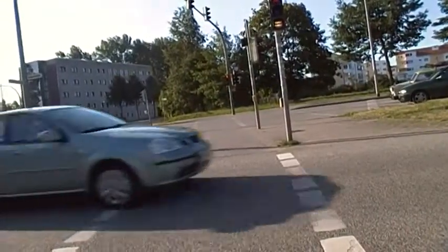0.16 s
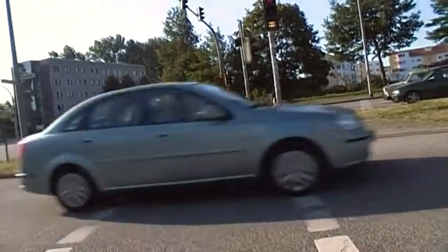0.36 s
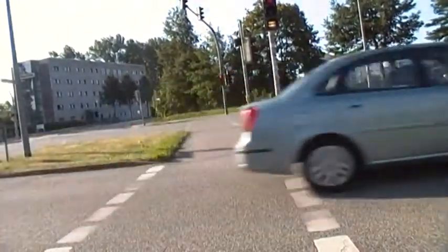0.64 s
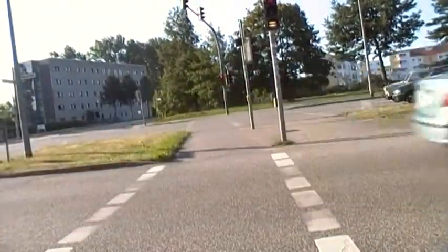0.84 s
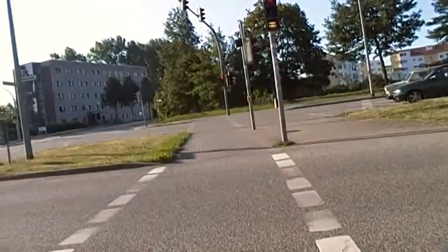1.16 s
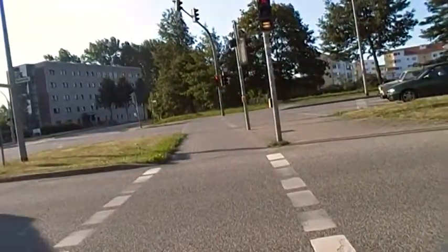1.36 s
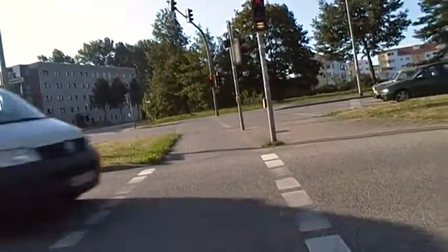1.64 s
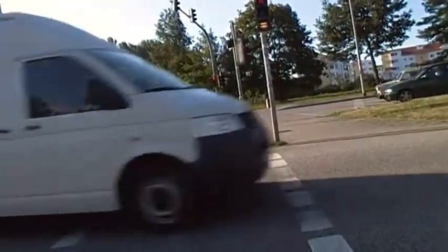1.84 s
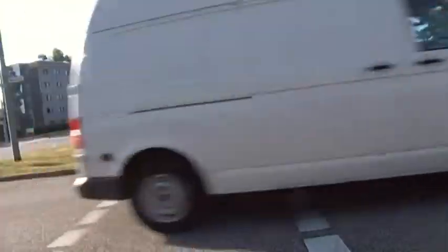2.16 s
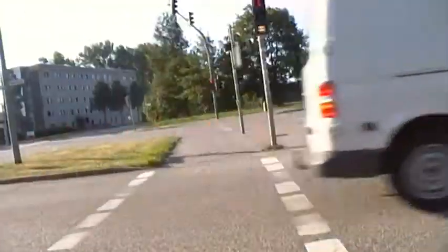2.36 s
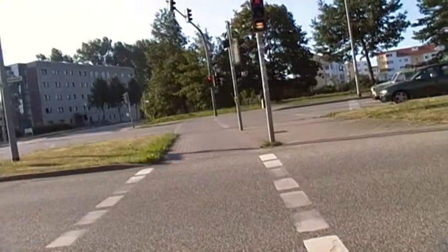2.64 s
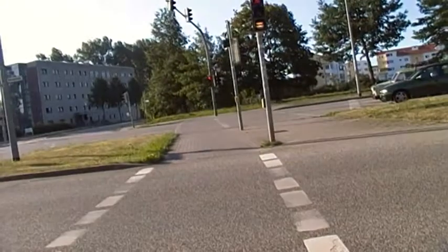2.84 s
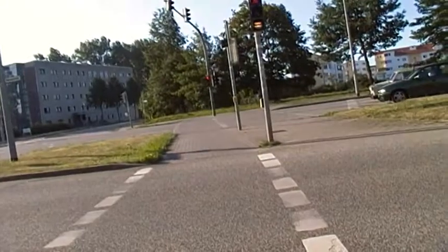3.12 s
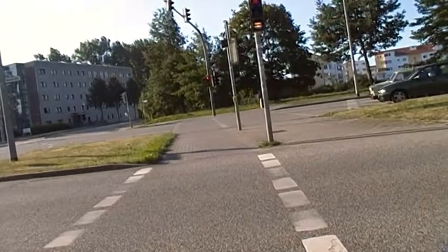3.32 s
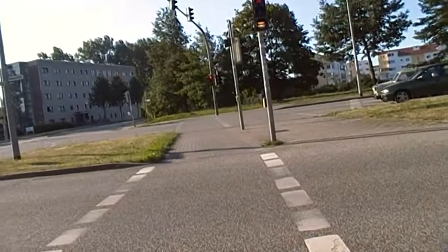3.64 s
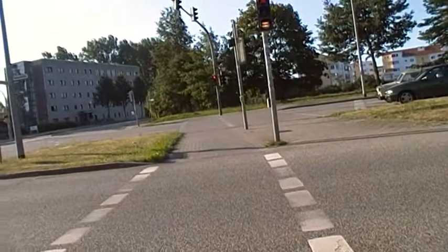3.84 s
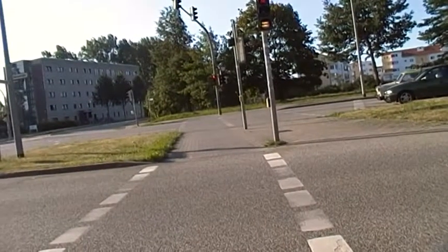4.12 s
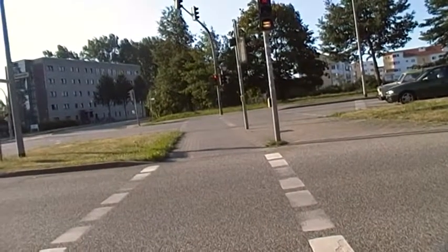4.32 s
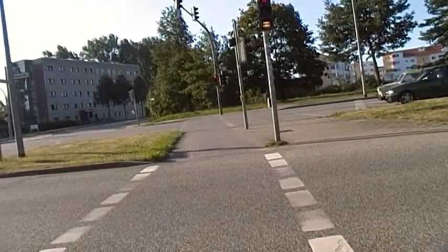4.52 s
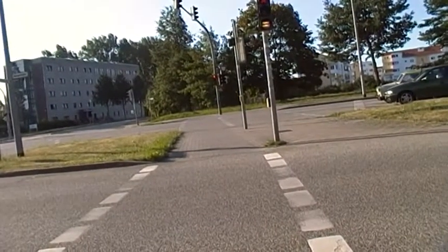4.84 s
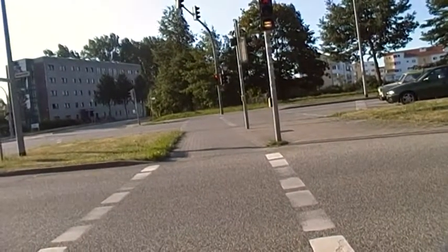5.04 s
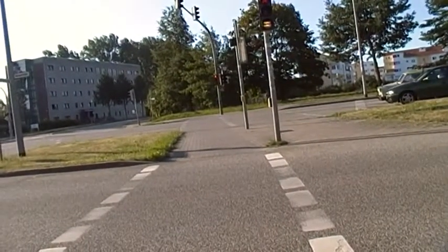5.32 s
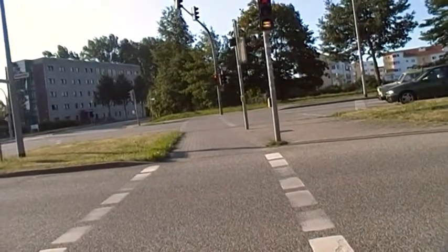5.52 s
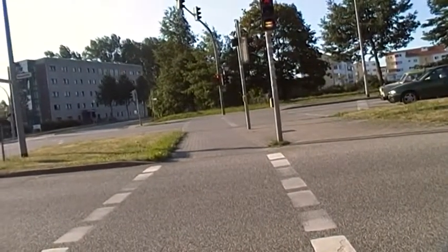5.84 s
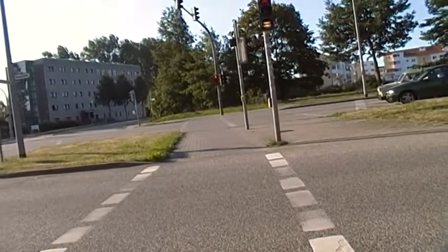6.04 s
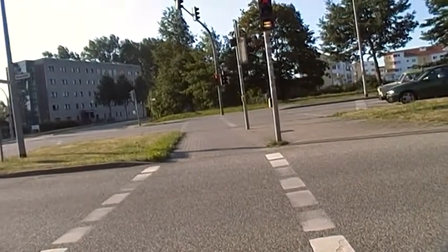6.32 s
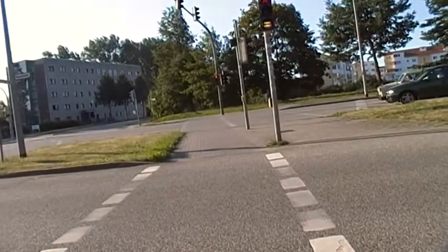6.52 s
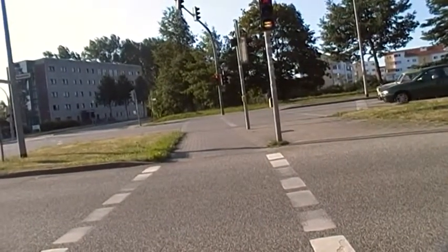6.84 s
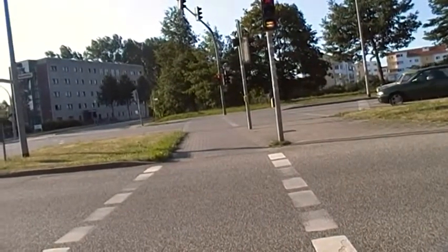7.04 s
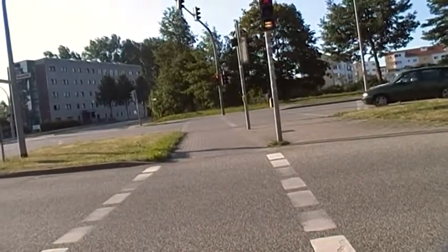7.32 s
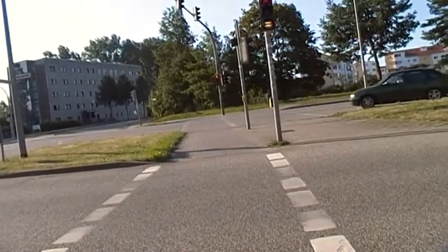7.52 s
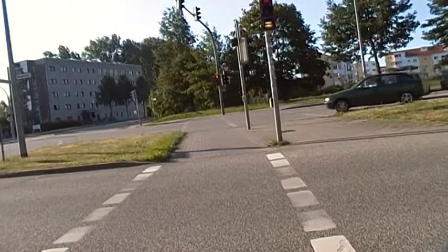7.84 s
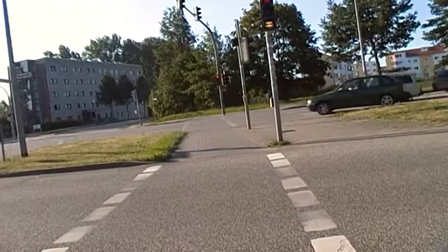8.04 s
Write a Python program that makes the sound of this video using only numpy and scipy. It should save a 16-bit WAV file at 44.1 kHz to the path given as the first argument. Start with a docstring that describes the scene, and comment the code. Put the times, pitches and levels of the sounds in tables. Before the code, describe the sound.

An exposed stereo microphone stands at the kerb of a city crossing. From 0 to about 1.4 seconds violent wind thumps and flutters, low and lumpy, jumping between left and right, largely covering a car whose tyres rush past near 0.4. Wind eases as a van approaches, passing left to right around 2.25 with broad tyre roar, airy tread hiss and a whine that drops in pitch near 1.8; its roar and low drone trail away by 3.5. From 3.6 to 5.4 gusts batter again over the rush of far traffic swelling near 4.2, with a small hollow grit snap at 4.04. Then it is calmer, with softer distant tyre rush. Around 6.4 a low exhaust revs quickly, then sinks in pitch as the car pulls away; faint high sizzles flicker near 6.5 to 7. Near 7.8 other engines drone upward, with a brief wind puff.

```python
"""Windy city crossing

Heard from the kerb: a saloon, then a van roll past from left to right as shaped noise, with a whine
from the van's tread. Noise rushes on the far lanes, and a car built from exhaust harmonics revs and
pulls away. Wind noise and decaying thumps buffet two microphone ports, with pressure gusts beneath;
each port's limiters duck its own channel."""
import sys
import numpy as np
from scipy import signal
from scipy.fft import rfft, irfft, next_fast_len
from scipy.io import wavfile

SR = 44100
rng = np.random.default_rng(int(sys.argv[2]) if len(sys.argv) > 2 else 0)


def dump_mix(stems):
    """Bounce the given channels to the path in sys.argv[1] as a 16-bit WAV at rate SR."""
    frames = np.atleast_2d(stems).T  # one column per channel
    limited = np.clip(frames, -1, 1)  # hard clip at full scale
    pcm = np.round(limited * 32767).astype(np.int16)
    wavfile.write(sys.argv[1], SR, pcm)


N = 360738
TIME = np.arange(N) / SR   # s

# Spectra, relative since the noise is levelled afterwards: f/Hz, density level/dB per Hz
ROAR_SPECTRUM = [(40, -3), (130, -11.5), (300, -3), (450, -4), (560, -5.5), (700, -3.5), (920, -1),
                 (1450, -4), (2000, -11), (2800, -22.5), (5000, -50), (11000, -64)]       # tyres on the asphalt
HISS_SPECTRUM = [(40, -21), (1200, -19), (2350, -0.5), (2700, -2.5), (3350, 1), (4400, -3), (5200, -6.5),
                 (6300, -7), (8000, -14), (9200, -19.5), (11000, -47.5)]       # air out of the tread
RUSH_SPECTRUM = [(25, -1), (60, 6.5), (120, 0), (250, -3), (420, -7.5), (630, -4.5), (770, 0), (1150, 1),
                 (1550, -0.4), (2000, -8), (2700, -16), (3600, -15), (8500, -26.5), (11000, -53)]       # distant tyres merged
BUFFET_SPECTRUM = [(20, -3), (55, 2.5), (110, 2.5), (170, 0), (240, -5.5), (340, -13), (500, -36),
                   (800, -34), (1500, -44), (3000, -44), (11000, -54.5)]   # wind breaking on a port
# How alike road noise is at the two ports: f/Hz, likeness/1
PORT_LIKENESS = [(30, 1), (600, 0.97), (1200, 0.94), (2500, 0.93), (5000, 0.89), (10000, 0.11)]

# Bunches of cars on the far lanes: abeam t/s, distance/m, speed/(m/s), rush level abeam/dB
FAR_PASSES = [(4.15, 8.1, 11.7, -19), (5.5, 7.6, 20, -22.5), (6.9, 7.6, 9.8, -18.5), (8.4, 10.4, 11.3, -23)]
FAR_HISS_DB = -17   # tread hiss against the rush
# Engines idling at the lights: f/Hz, level/dB
IDLING_ENGINES = [(58, -41), (190, -38), (312, -41), (455, -41)]
# Other engines picking up briefly: start t/s, length/s, f/Hz, rise/(Hz/s), level/dB
ENGINE_PICKUPS = [(6.33, .32, 189, 0, -33), (6.9, .2, 174, 45, -26), (7.8, .6, 114, 80, -27),
                  (7.86, .55, 165, 10, -30), (7.92, .5, 222, 25, -33)]
PICKUP_RISE_S = 0.08

# Swells of a faint high sizzle: peak t/s, level/dB
SIZZLE_SWELLS = [(6.48, -53), (6.78, -47), (7.05, -48.5)]
SIZZLE_WIDTH_S = 0.11   # from peak to half gain
# A bit of grit snaps from under a tyre, and a hollow knock rises in pitch with it
TICK_S, TICK_DB = 4.041, -19
KNOCK_HZ, KNOCK_RISE_HZ, KNOCK_LENGTH_S, KNOCK_DB = 450, 230, 0.006, -17

# Spells of wind, before lumps, swells and lift: start t/s, length/s, left level/dB, right level/dB
WIND_SPELLS = [(0, 0.97, -13.5, -14.5), (0.985, 0.42, -16.5, -20.5), (1.504, 0.29, -18.5, -23),
               (1.85, 1, -22, -30), (2.835, 0.72, -19.5, -33), (3.658, 0.66, -15.5, -20),
               (4.387, 0.15, -23, -13), (4.598, .3, -15.5, -13.5), (5.002, 0.35, -12, -25),
               (5.498, 0.51, -28.5, -33), (6.379, 0.028, -23, -21.5), (7.617, 0.15, -21, -24)]
SPELL_RISE_S, SPELL_FALL_S, BREEZE_DB = 0.027, 0.12, -38
# Largest eddies thumping on the ports: t/s, left level/dB, right level/dB, f at the peak/Hz, swell time/s
LARGE_THUMPS = [(.001, 4, -23, 250, 0.0019), (.094, -16, -4.5, 280, 0.0036), (.121, -11, -6, 253, 0.0032),
                (.149, 8, -16, 288, .0013), (.198, -10, 4, 240, 0.0017), (.221, 1, -17, 205, 0.0014),
                (.25, 10, -18, 225, 0.0015), (.298, -8, -9, 260, .006), (.359, -1, -18, 209, 0.0026),
                (.383, -5, 8, 307, .0012), (.418, 0, -24, 230, 0.0026), (.447, -4, -30, 126, 0.0055),
                (.476, 5.5, -28, 185, 0.0011), (.552, -8, 7, 230, 0.0016), (.571, -10, -27, 176, 0.0028),
                (.609, 7, -16, 306, .004), (.647, 5, -10, 190, 0.0031), (.664, 0, -5, 166, 0.0024),
                (.709, -2, -18, 215, 0.0023), (.724, -16, -8, 282, 0.0052), (.75, -19, 11, 225, 0.0013),
                (.77, -21, -6, 216, .005), (.802, 3, -16, 207, 0.004), (.853, -0.5, -15, 165, 0.0015),
                (.899, 3.5, -17, 165, 0.0036), (.968, -4, -8, 176, 0.0031), (1.004, 4, -22, 290, 0.0021),
                (1.098, 2, -8, 135, 0.0024), (1.167, -10, -26, 120, 0.0033), (1.231, -12, 4, 230, 0.0017),
                (1.306, 0, -21, 135, .003), (1.336, -9, 4, 119, 0.0038), (1.348, -6, 0.5, 236, 0.0017),
                (1.464, -7, -29, 137, 0.0036), (1.644, -6, -22, 148, 0.0033), (1.686, -2, -28, 179, 0.0027),
                (1.757, -21, -8, 177, 0.0023), (1.822, -13, -22, 194, 0.0022), (1.873, -18, -8, 156, .003),
                (1.956, -25, -5, 253, 0.0014), (2.122, -17, -9, 250, 0.0017), (2.308, -9, 3, 257, 0.0014),
                (2.373, -3, -25, 129, .003), (2.513, -20, -8, 240, .0015), (2.53, -5, -25, 140, .003),
                (2.957, -6, -18, 186, .003), (3.222, -12, -7, 254, .0015), (3.323, -9, -19, 229, 0.0035),
                (3.545, -9, -25, 134, .005), (3.637, -9, -10, 80, .004), (3.723, 0, -20, 130, 0.0035),
                (3.778, -22, -1, 175, 0.0027), (3.834, -7, -23, 182, 0.0032), (3.87, -6, -20, 79.6, 0.01),
                (3.923, -9, -21, 114, 0.0034), (3.944, -1, -20, 166, 0.004), (3.997, -4, -31, 165, .004),
                (4.036, -7, -23, 150, 0.0063), (4.088, -19, -22, 70, 0.0055),
                (4.155, -11, -22, 108, 0.0067), (4.179, 0, -25, 225, 0.0019),
                (4.208, -10, -15, 157, 0.0021), (4.255, -18, -9, 253, 0.008), (4.284, -1, -14, 220, 0.0021),
                (4.332, -17, 0, 290, 0.0014), (4.353, -25, -1, 200, .003), (4.439, -20, 4.5, 175, 0.0025),
                (4.471, -22, 0, 209, .0018), (4.625, -6, -12, 143, 0.0026), (4.724, -7, -6, 140, .003),
                (4.755, -10, -4, 70, 0.004), (4.782, -9, -8, 85, .004), (4.844, 0, -12, 185, 0.0024),
                (5.037, -3, -16, 137, 0.0032), (5.077, -10, -21, 172, 0.0044),
                (5.119, -11, -22, 90, 0.0039), (5.135, 3, -13, 225, 0.0018), (5.156, -4, -25, 178, .002),
                (5.177, -1, -12, 114, .006), (5.222, 0, -13, 130, .005), (5.236, -5, -16, 210, .003),
                (5.258, 0, -23, 162, .002), (5.307, -4, -25, 160, .004), (5.344, 1, -19, 115, 0.0078)]
# Smaller eddies come by chance; their level is set against the wind
EDDIES_PER_S, EDDY_DB, EDDY_SPREAD_DB, EDDY_HZ = 7.1, -2.5, 1.5, 110
EDDY_SAG = 0.12   # share by which a thump's pitch sinks below its pitch at the peak
# Gust pressure below hearing: start t/s, dying time/s, left peak level/dB, right peak level/dB
PRESSURE_GUSTS = [(0, 0.015, -5, 1), (0.211, 0.059, -7, 0.5), (.374, 0.024, -2.5, 0), (.395, 0.12, -13, 7),
                  (.595, 0.015, -5, -5), (.705, 0.065, -5, -30), (.81, 0.063, -7, -4),
                  (.972, .03, -6, -2.5), (1.227, 0.085, -16, -1.5), (1.315, 0.051, -6.5, -16),
                  (2.30, 0.24, -12, -1.5), (2.49, 0.14, -8, -10), (3.72, 0.024, -3, -16),
                  (3.78, 0.4, -13, -6), (4.477, 0.14, -38, 2.5), (5.05, 0.018, -6.5, -9),
                  (5.15, 0.18, -13, -26)]

# Exhaust overtones, before pipe and silencer: multiple of the firing rate/1, level/dB
EXHAUST_OVERTONES = [(1.5, -16), (2, 2), (2.5, -18), (3, -2.5), (4, 0)]
# Pipe resonances that lift an overtone gliding through: f/Hz, width/Hz, peak lift/dB
PIPE_RESONANCES = [(116, 7, 4), (183, 12, 6)]
# The car pulling away: firing rate climbs from idle, then the clutch drags it down to a crawl
REV_S, REV_RISE_S = 6.48, 0.28
IDLE_HZ, REV_HZ, CRAWL_HZ, SAG_HZ_PER_S = 54, 79.8, 56.4, 27
THROTTLE_S, THROTTLE_RISE_S = 6.35, 0.18
IDLE_BOOM_DB, IDLE_OVERTONES_DB = -28.5, -39   # levels at idle
THROTTLE_DB, REVS_DB = 7.5, 4.5   # lift from the open throttle; boom lift from high revs
ROLL_UP_DB_PER_S = 15   # swell while it rolls up, until it revs

# Near vehicles: distance/m, speed/(m/s), tyre roar level/dB, tread hiss level/dB
SALOON = (3, 16.5, -22.5, -47.5)
VAN = (7, 11.5, -21, -22)
SALOON_ABEAM_S, VAN_ABEAM_S = 0.42, 2.25   # when each is straight ahead of the listener
HORN_DB, AHEAD_DB = 9.5, 1.5   # roar is stronger along the road than sideways, and a little more ahead
HISS_BEHIND_DB = -0.5   # negative: the hiss is slightly weaker behind the vehicle than ahead
GROUND_DB_PER_M = 0.0233   # loss over the ground, on top of spreading
PORT_LAG_MS = 0.051   # left port's lag when a vehicle is far off to the right
LEFT_BIAS_DB, PAN_DB_PER_MS = 2.5, 32
# Tones of the van's tread: f coming/Hz, f going/Hz, width/Hz, level against the roar/dB
TREAD_TONES = [(962, 875, 48, -13.5), (665, 555, 38, -15), (410.3, 290, 38, -16)]
FRONT_AXLE_S, GLIDE_S = 1.8, 0.25   # the tones fall in pitch as the front wheels pass
TONE_FLUTTER_DB = 3.5   # uneven asphalt breaks the tones up
VAN_FIRING_HZ, VAN_DOPPLER = 76.1, 0.05
VAN_ENGINE_DB, TAILPIPE_DB = -47.5, 21   # level abeam; the exhaust is louder from behind
# Surges of tyre noise: peak t/s, half length/s, f/Hz, width/Hz, level/dB
TYRE_SURGES = [(1.15, 0.12, 3430, 500, -33), (1.186, 0.039, 650, 80, -27.5), (1.573, 0.063, 936, 110, -25),
               (1.63, 0.22, 4120, 900, -31), (2.148, 0.2, 564, 100, -28.5), (2.21, 0.14, 880, 111, -23),
               (2.237, 0.19, 4250, 1200, -31.5), (2.672, 0.056, 4150, 450, -30.5),
               (2.983, 0.19, 6800, 1110, -34.5), (2.97, 0.13, 3660, 700, -31.5),
               (3.325, .05, 586, 220, -22.5), (3.5, 0.3, 1550, 400, -29), (3.9, 0.28, 2700, 1300, -33.5),
               (4.9, .12, 1160, 120, -29), (5.8, 0.32, 817, 100, -29), (6.8, 0.28, 324, 60, -36),
               (6.828, 0.13, 5800, 2200, -38)]

CUTOFF_HZ = 11000   # top of the finished sound


def from_db(db):
    """Decibels to gain."""
    return 10 ** (np.asarray(db) / 20)


def rms_one(x):
    """Scale to unit power."""
    return x / np.sqrt(np.mean(x ** 2) + 1e-20)


def at_hz(points, hz):
    """Read a spectrum on a log-frequency axis."""
    point_hz, values = np.array(points).T
    return np.interp(np.log(hz), np.log(point_hz), values)


def drift(rate_hz):
    """Slow random wander of rms 1: two-pole smoothed noise, drawn at every 40th sample."""
    r = np.exp(-80 * np.pi * rate_hz / SR)
    white = rng.standard_normal(N // 40 + 2002)
    slow = signal.lfilter([1], [1, -2 * r, r * r], white)[2000:]   # skip the settling
    return np.interp(np.arange(N) / 40, np.arange(len(slow)), rms_one(slow))


def band(x, edges, kind="band"):
    """Butterworth filter of design order 2."""
    return signal.sosfilt(signal.butter(2, edges, kind, fs=SR, output="sos"), x)


def coloured(spectrum, likeness):
    """Stereo noise of rms 1 with a smooth spectrum, mixing what the ports share and what they do not."""
    size = next_fast_len(N)
    hz = np.maximum(np.arange(size // 2 + 1) * SR / size, 1)
    alike = np.clip(at_hz(likeness, hz), -1, 1) if likeness else 0 * hz
    white = rfft(rng.standard_normal((2, size)))
    shaped = white * from_db(at_hz(spectrum, hz)) * np.sqrt([1 + alike, 1 - alike])
    mid, side = irfft(shaped, size)[:, :N]
    return rms_one(band(np.array([mid + side, mid - side]), 24, "high"))


def place(pair, lag_ms, pan_db):
    """Direction from time and level: positive lag delays the left, positive pan favours it."""
    left = np.interp(TIME - lag_ms / 1000, TIME, pair[0])
    return np.array([left * from_db(pan_db / 2), pair[1] * from_db(-pan_db / 2)])


def wavering_tone(hz, width_hz):
    """A narrow band of noise around a steady or moving pitch."""
    phase = 2 * np.pi * np.cumsum(hz * np.ones(N)) / SR
    return rms_one(drift(width_hz) * np.cos(phase) + drift(width_hz) * np.sin(phase))


def drive_by(abeam_s, distance_m, speed_m_per_s):
    """A straight pass: level in dB against the nearest point, bearing from -1 (left) to 1 (right)."""
    along_m = speed_m_per_s * (TIME - abeam_s)
    range_m = np.hypot(along_m, distance_m)
    spreading_db = 20 * np.log10(distance_m / range_m)
    ground_db = GROUND_DB_PER_M * (range_m - distance_m)
    return spreading_db - ground_db, along_m / range_m


def far_traffic():
    """Many distant tyres merge into one rush, a little to the right; waiting engines hum under it."""
    gain = np.sqrt(sum(from_db(db + drive_by(*path)[0]) ** 2 for *path, db in FAR_PASSES))
    roar = coloured(RUSH_SPECTRUM, PORT_LIKENESS)
    hiss = from_db(FAR_HISS_DB) * coloured(HISS_SPECTRUM, PORT_LIKENESS)
    rush = gain * from_db(0.45 * drift(6)) * (roar + hiss)
    hum = sum(from_db(db) * wavering_tone(hz, width_hz=3.5) for hz, db in IDLING_ENGINES)
    return place(rush + hum, lag_ms=0.04, pan_db=-1.1)


def other_engines():
    """Engines in the queue drone up as steady or rising sines and fade again."""
    out = np.zeros(N)
    for start, length_s, hz, hz_per_s, db in ENGINE_PICKUPS:
        age = np.clip(TIME - start, 0, length_s)
        swell = np.minimum(np.minimum(age, length_s - age) / PICKUP_RISE_S, 1)
        phase = 2 * np.pi * np.cumsum(hz + hz_per_s * age) / SR
        out += from_db(db) * swell * np.sqrt(2) * np.sin(phase)
    return out


def sizzle():
    """A thin band of high noise that swells three times."""
    swells = sum(from_db(db) / (1 + ((TIME - s) / SIZZLE_WIDTH_S) ** 4) for s, db in SIZZLE_SWELLS)
    return swells * rms_one(band(rng.standard_normal((2, N)), [9600, 10150]))


def grit_snap():
    """Grit snaps as a decaying noise burst, with a short hollow knock gliding upwards."""
    age = np.maximum(TIME - TICK_S, 0)
    dying = (age > 0) * np.exp(-np.minimum(age / 0.00087, 20))
    snap = dying * rms_one(band(rng.standard_normal(N), [900, 4500]))
    rung = np.minimum(age / KNOCK_LENGTH_S, 20)
    phase = 2 * np.pi * np.cumsum(KNOCK_HZ + KNOCK_RISE_HZ * np.tanh(rung / 2)) / SR
    knock = rung * np.exp(1 - rung) * np.sin(phase)
    return from_db(TICK_DB) * snap + from_db(KNOCK_DB) * knock


def wind_force():
    """Wind at each port: over a light breeze, each spell builds, holds and dies away."""
    power = from_db(BREEZE_DB) ** 2
    for start, length_s, left_db, right_db in WIND_SPELLS:
        rise = np.clip((TIME - start) / SPELL_RISE_S, 0, 1)
        fall = np.exp(-np.clip((TIME - start - length_s) / SPELL_FALL_S, 0, 20))
        power = power + (from_db([[left_db], [right_db]]) * rise * fall) ** 2
    return np.sqrt(power)


def small_eddies(force):
    """Chance thumps that follow the wind at each port, as rows like those of the large ones."""
    draws = rng.random((int(EDDIES_PER_S * N / SR), 4))
    at = (draws[:, 0] * N).astype(int)
    spread_db = EDDY_SPREAD_DB * (2 * draws[:, 1:3].T - 1)
    left_db, right_db = EDDY_DB + 20 * np.log10(force[:, at]) + spread_db
    hz = EDDY_HZ * 2 ** (2 * draws[:, 3] - 1)   # within an octave either way
    return list(zip(at / SR, left_db, right_db, hz, 1 / (np.pi * hz)))


def thumps(rows, flutter_share):
    """An eddy swells, shakes each port for a cycle or a few with some flutter, and sinks in pitch."""
    out = np.zeros((2, N))
    flutter = rms_one(band(rng.standard_normal((2, N)), [110, 460]))
    signs = rng.choice([-1, 1], len(rows))
    for (start, left_db, right_db, hz, swell_s), sign in zip(rows, signs):
        first = max(int(start * SR), 0)
        span = slice(first, first + SR // 10)
        age = np.maximum(TIME[span] - start, 0)
        grown = np.minimum(age / swell_s, 20)
        envelope = (grown * np.exp(1 - grown)) ** 1.28
        phase = 2 * np.pi * np.cumsum(hz * (1 - EDDY_SAG * np.tanh(grown - 1))) / SR
        push = sign * np.sin(phase) + flutter_share * flutter[:, span]
        out[:, span] += from_db([[left_db], [right_db]]) * envelope * push
    return out


def wind():
    """Eddies break on each port in lumps; stronger wind makes smaller, brighter eddies."""
    force = wind_force()
    lumps_db = 2.8 * np.array([drift(36), drift(36)])
    swells_db = 0.6 * np.array([drift(6), drift(6)])
    strength = force * from_db(lumps_db + swells_db + 1.24)   # with a small lift
    eddies = coloured(BUFFET_SPECTRUM, None)
    deep = band(eddies, 141, "low")
    brightness = np.minimum(strength / from_db(-10), 1.2) ** 0.98
    knocks = thumps(list(LARGE_THUMPS) + small_eddies(force), flutter_share=0.35)
    return strength * (deep + brightness * (eddies - deep)) + knocks


def gusts(rise_s):
    """Each gust is a swell of pressure that builds quickly and dies away."""
    out = np.zeros((2, N))
    for start, dying_s, left_db, right_db in PRESSURE_GUSTS:
        age = np.maximum(TIME - start, 0)
        build = 1 - np.exp(-(age / rise_s) ** 2)
        swell = build * np.exp(-np.minimum(age / dying_s, 20))
        out += from_db([[left_db], [right_db]]) * swell / swell.max()
    return out


def exhaust(firing_hz, boom_db, overtones_db, unevenness_db):
    """The firing rate booms; uneven cylinders add half orders, and the silencer mutes the high ones."""
    silencer_hz = 197
    phase = 2 * np.pi * np.cumsum(firing_hz * (1 + 0.003 * drift(6))) / SR
    out = from_db(boom_db + unevenness_db * drift(21)) * np.sin(phase)
    for multiple, db in EXHAUST_OVERTONES:
        overtone_hz = multiple * firing_hz
        passed = 1 / np.sqrt(1 + (overtone_hz / silencer_hz) ** 50)
        pipe_db = sum(peak_db * np.exp(-0.5 * ((overtone_hz - hz) / width_hz) ** 2)
                      for hz, width_hz, peak_db in PIPE_RESONANCES)
        gain = passed * from_db(overtones_db + db + pipe_db + 0.3 * drift(1.8))
        out += gain * np.sin(multiple * phase + rng.uniform(0, 2 * np.pi))
    return np.sqrt(2) * out


def leaving_car():
    """The car rolls up, revs, then sinks in pitch as its clutch takes hold."""
    age = TIME - REV_S
    climb = np.sin(np.pi / 2 * np.clip(age / REV_RISE_S, 0, 1))
    slip_hz = REV_HZ - CRAWL_HZ - SAG_HZ_PER_S * np.maximum(age - REV_RISE_S, 0)
    slip_hz = 2 * np.logaddexp(0, slip_hz / 2)   # the clutch closes softly
    firing_hz = IDLE_HZ + climb * (CRAWL_HZ + slip_hz - IDLE_HZ)
    throttle = np.clip((TIME - THROTTLE_S) / THROTTLE_RISE_S, 0, 1)
    effort_db = THROTTLE_DB * throttle + ROLL_UP_DB_PER_S * np.minimum(age, 0)
    boom_db = IDLE_BOOM_DB + effort_db + REVS_DB * climb * np.tanh(slip_hz / 3)
    return exhaust(firing_hz, boom_db, IDLE_OVERTONES_DB + effort_db, unevenness_db=0.6)


def tyre_surges():
    """Here and there the tyre noise swells in one band: a howl when low, a rush of hiss when high."""
    noise = coloured([(40, 0), (11000, 0)], PORT_LIKENESS)   # flat
    out = np.zeros((2, N))
    for s, half_s, hz, width_hz, db in TYRE_SURGES:
        swell = np.exp(-0.5 * ((TIME - s) / half_s) ** 2)
        tone = rms_one(band(noise, [hz - width_hz / 2, hz + width_hz / 2]))
        out += from_db(db) * swell * tone
    _, bearing = drive_by(VAN_ABEAM_S, *VAN[:2])
    return place(out, PORT_LAG_MS * bearing, pan_db=3.0)


def van_engine():
    """The van drones past, lower and louder once its tailpipe faces the kerb."""
    level_db, bearing = drive_by(VAN_ABEAM_S, *VAN[:2])
    boom_db = VAN_ENGINE_DB + level_db + TAILPIPE_DB * bearing
    firing_hz = VAN_FIRING_HZ * (1 - VAN_DOPPLER * bearing)
    return exhaust(firing_hz, boom_db, boom_db - 3, unevenness_db=2)


def tread_tones():
    """The van's tread blocks whine and howl, dropping in pitch as it passes."""
    gone = 0.5 + 0.5 * np.tanh((TIME - FRONT_AXLE_S) / GLIDE_S)
    tones = sum(from_db(db) * wavering_tone(coming_hz + gone * (going_hz - coming_hz), width_hz)
                for coming_hz, going_hz, width_hz, db in TREAD_TONES)
    return from_db(TONE_FLUTTER_DB * drift(10.6)) * tones


def near_tyres(abeam_s, vehicle, whines):
    """Tyres roar on the asphalt, most of all along the road, and air hisses out of the tread."""
    *path, roar_db, hiss_db = vehicle
    level_db, bearing = drive_by(abeam_s, *path)
    road_db = 0.6 * drift(9)   # patches of rougher asphalt
    roar = coloured(ROAR_SPECTRUM, PORT_LIKENESS) + (tread_tones() if whines else 0)
    roar = from_db(roar_db + HORN_DB * bearing ** 2 - AHEAD_DB * bearing) * roar
    grain_db = 0.7 * drift(70)   # the tread slaps over coarse stones
    hiss_gain = from_db(hiss_db + grain_db + HISS_BEHIND_DB * bearing)
    hiss = hiss_gain * coloured(HISS_SPECTRUM, PORT_LIKENESS)
    lag_ms = PORT_LAG_MS * bearing
    pan_db = LEFT_BIAS_DB + PAN_DB_PER_MS * lag_ms   # left stays louder, most with the vehicle at right
    return place(from_db(level_db + road_db) * (roar + hiss), lag_ms, pan_db)


def scene():
    """Road, engines, small sounds and wind summed at the two ports."""
    saloon = near_tyres(SALOON_ABEAM_S, SALOON, whines=False)
    van = near_tyres(VAN_ABEAM_S, VAN, whines=True)
    road = far_traffic() + tyre_surges() + saloon + van
    engines = other_engines() + leaving_car() + van_engine()
    small_sounds = sizzle() + grit_snap()
    return road + engines + small_sounds + wind() + gusts(rise_s=0.014)


def limiter(x, ceiling_db, release_db_per_s, attack_s):
    """Each channel is turned down by its own smoothed peaks and recovers at a steady rate."""
    over_db = np.maximum(20 * np.log10(np.abs(x) + 1e-9) - ceiling_db, 0)
    r = np.exp(-1 / (attack_s * SR))
    wanted_db = signal.lfilter([1 - r], [1, -r], over_db)
    recovery_db = release_db_per_s * TIME
    cut_db = np.maximum.accumulate(wanted_db + recovery_db, axis=1) - recovery_db
    return x * from_db(-cut_db)


def record(dry):
    """A slow and a quick limiter, a low cut against the gust pressure, rounded peaks, a steep top cut."""
    levelled = limiter(dry, ceiling_db=-2, release_db_per_s=79, attack_s=0.16)
    held = limiter(levelled, ceiling_db=-7.5, release_db_per_s=176, attack_s=0.00081)
    rounded = 0.9 * np.tanh(band(held, 27, "high") / 0.9)
    top_cut = signal.ellip(10, 0.2, 80, CUTOFF_HZ, fs=SR, output="sos")
    return signal.sosfilt(top_cut, rounded)


dry = scene()
out = record(dry)
dump_mix(out)
```